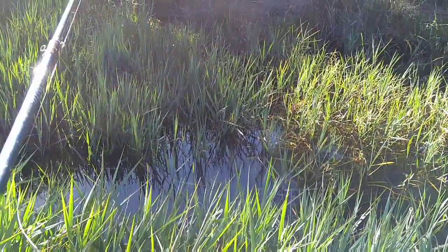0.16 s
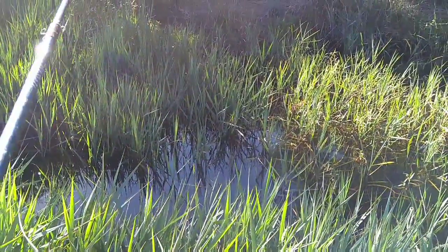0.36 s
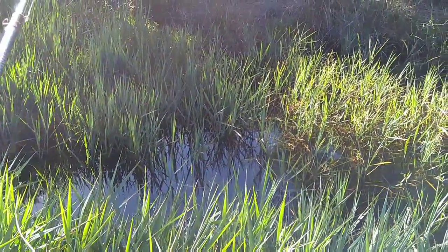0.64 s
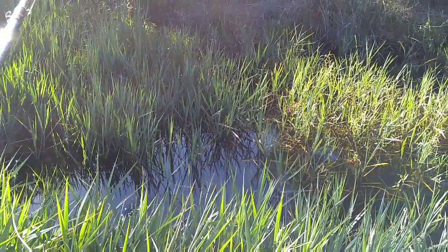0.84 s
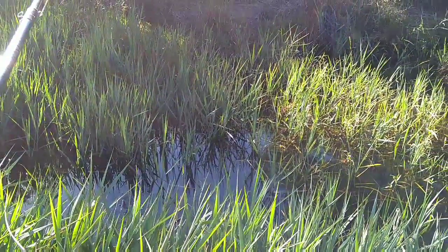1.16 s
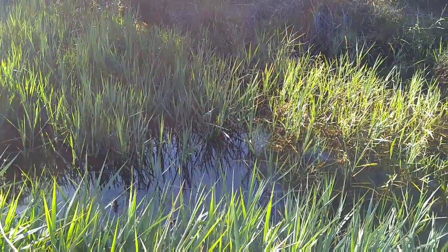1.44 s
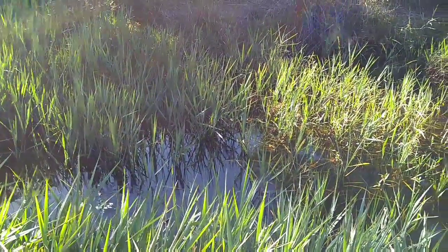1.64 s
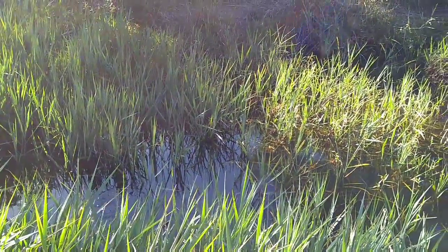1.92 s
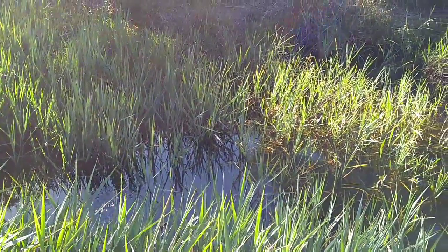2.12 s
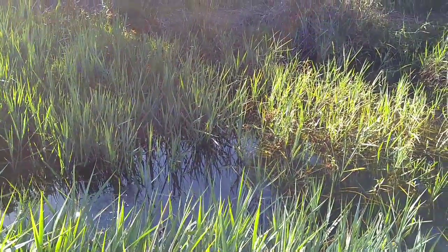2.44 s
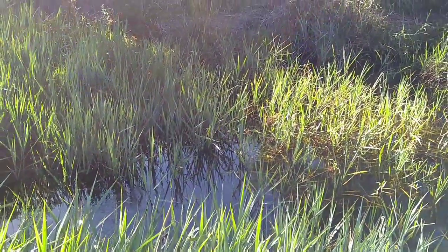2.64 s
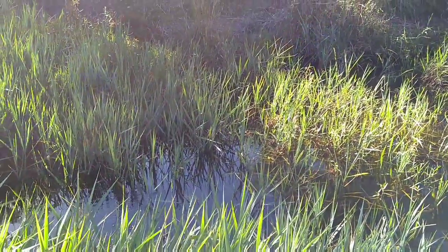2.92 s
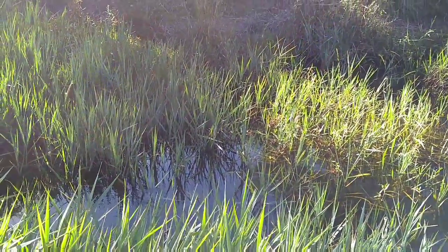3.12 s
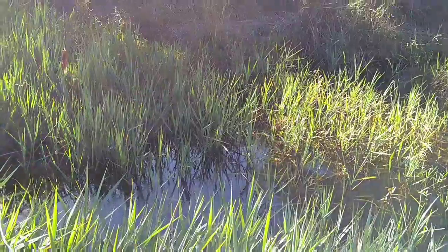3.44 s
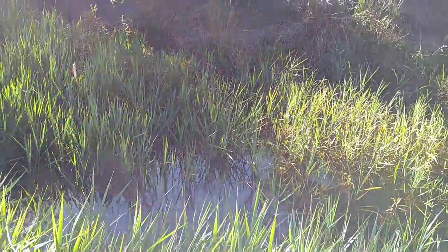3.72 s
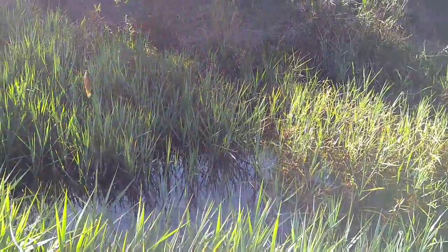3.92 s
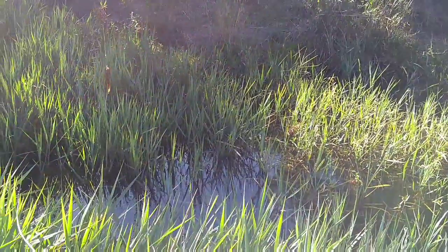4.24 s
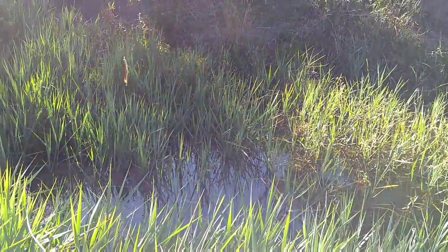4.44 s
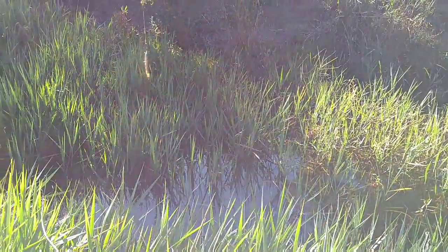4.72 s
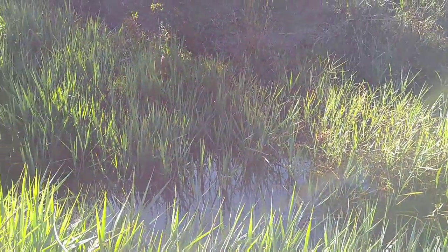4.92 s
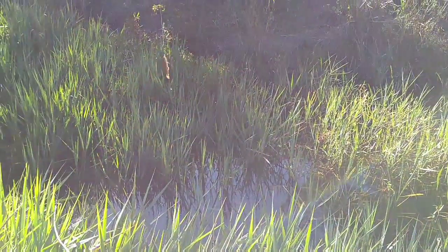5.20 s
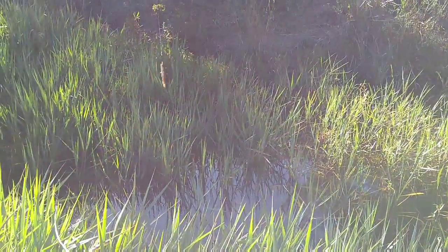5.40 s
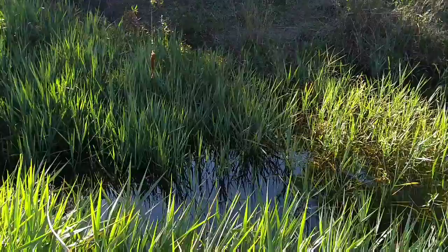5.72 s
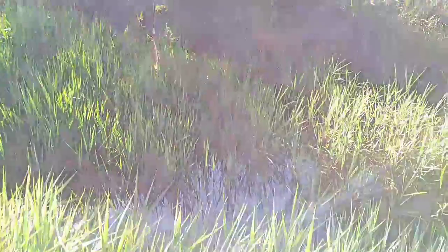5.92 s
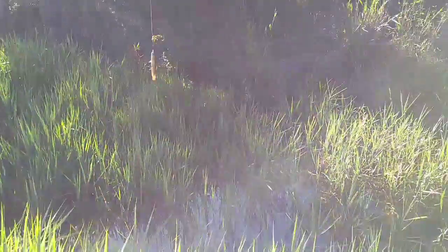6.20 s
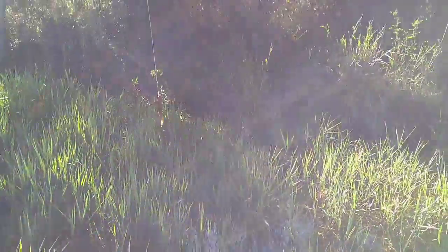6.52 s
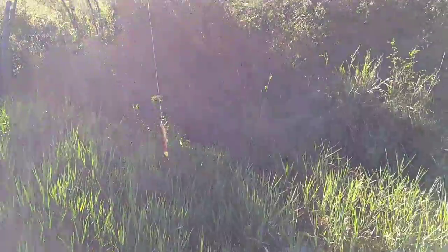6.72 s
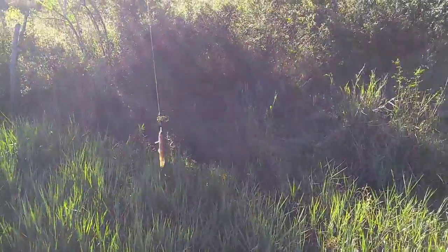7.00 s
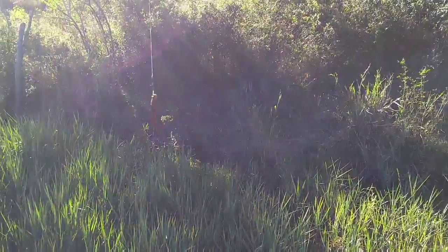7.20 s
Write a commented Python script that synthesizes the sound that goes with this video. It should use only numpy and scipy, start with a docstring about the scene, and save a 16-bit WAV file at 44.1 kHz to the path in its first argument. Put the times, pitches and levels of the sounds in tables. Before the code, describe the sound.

Many crickets trill and chirp brightly and continuously outdoors over faint rumble and hiss; a single hard knock and a small dry rustle interrupt.

```python
"""A reedy pond in the evening: crickets sing all around, some trilling on and on, others in even chirps.
Each wing stroke is a short falling sine tone, scattered by the reeds and echoed weakly by the far bank.
Shaped noise makes a far rumble and thin hiss; damped sines and noise make one sharp knock, gliding sines
a few faint pips, and filtered random clicks a dry rustle. The recorder drops samples: a sawtooth timing
error copies the song into bands below and above it."""
import sys
import numpy as np
from scipy import signal
from scipy.fft import rfft, irfft, next_fast_len
from scipy.io import wavfile
from scipy.ndimage import map_coordinates

SR = 44100
rng = np.random.default_rng(int(sys.argv[2]) if len(sys.argv) > 2 else 0)


def wav_record(signal):
    """Record a signal, one row per channel, as 16-bit PCM in the file named by sys.argv[1]."""
    frames = np.transpose(np.atleast_2d(signal))
    bounded = np.clip(frames, -1, 1)
    # unit amplitude maps onto the largest positive 16-bit level
    quanta = np.round(bounded * 32767).astype(np.int16)
    wavfile.write(sys.argv[1], SR, quanta)


N = 324135
TIME = np.arange(N) / SR  # s


def undb(db):
    """Decibels to gain."""
    return 10 ** (np.asarray(db) / 20)


def unit(x):
    """Scale to rms 1."""
    return x / np.sqrt(np.mean(x ** 2))


def curve(rows, axis=1):
    """One column of a time table, joined by straight lines."""
    rows = np.array(rows)
    return np.interp(TIME, rows[:, 0], rows[:, axis])


def walk(rate):
    """Smooth random drift with a spread near 1, taking `rate` new values per second."""
    steps = np.repeat(rng.standard_normal(int(N / SR * rate) + 2), 4)
    smooth = np.convolve(steps, np.hanning(9) / 3, "same")
    return np.interp(TIME * rate * 4, np.arange(len(smooth)), smooth)


def colour(x, points):
    """Filter by a spectrum of (f/Hz, level/dB) points, joined on a log frequency scale."""
    hz, db = np.transpose(points)
    size = next_fast_len(N)
    f = np.maximum(np.arange(size // 2 + 1) * SR / size, 1)
    gain = undb(np.interp(np.log(f), np.log(hz), db))
    return irfft(rfft(x, size) * gain, size)[..., :N]


def reeds(x, pan_db, lead_ms, scatter_db, t60=0.055):
    """The direct sound reaches the two microphones apart; the stems add a short diffuse tail."""
    size = next_fast_len(N + SR // 2)
    t = np.arange(SR // 3) / SR
    tail = rng.standard_normal((2, len(t))) * undb(-60 * t / t60)
    tail /= np.sqrt(np.sum(tail ** 2, axis=1, keepdims=True))
    sides = np.array([[.5], [-.5]])  # left, right
    f = np.arange(size // 2 + 1) * SR / size
    direct = np.exp(2j * np.pi * f * sides * lead_ms / 1000)
    paths = (direct + undb(scatter_db) * rfft(tail, size)) / np.hypot(1, undb(scatter_db))
    heard = irfft(rfft(x, size) * paths, size)[:, :N]
    # keep the source's level, then pan
    return heard * np.std(x) / np.std(heard, axis=1, keepdims=True) * undb(sides * pan_db)


# spectrum of rumble and hiss, relative: f/Hz, level/dB per Hz
AIR_SPECTRUM = [(20, -28), (45, -24), (75, -7), (115, 5), (160, -6), (230, -19), (400, -22), (760, -20.7),
                (1150, -24.3), (2700, -28), (3400, -32), (4100, -41), (8000, -43), (15000, -27)]
# stereo width of the air: f/Hz, side minus mid level/dB
AIR_WIDTH = [(30, 13), (70, 6), (130, 7.5), (260, 5), (600, -1.5), (2000, -3.5)]
# swell of the rumble, relative: t/s, level/dB
RUMBLE_SWELL = [(0, .5), (2.2, 0), (2.75, -2.5), (3.7, 1.5), (4.25, -2), (5.2, -1), (5.7, 2.5), (6.4, 2.5),
                (7.35, -4)]
AIR_DB = -60


def air():
    """A far rumble and thin hiss; the bass is largely opposed between left and right."""
    mid, side = unit(colour(rng.standard_normal((2, N)), AIR_SPECTRUM))
    both = mid + colour(side, AIR_WIDTH) * np.array([[1], [-1]])
    bass = colour(both, [(170, -1), (400, -30)])
    swell = undb(curve(RUMBLE_SWELL) + 1.2 * walk(6))
    balance_db = np.array([[-.7], [.7]])
    return undb(AIR_DB + balance_db) * (both + (swell - 1) * bass)


BANK_S, BANK_DB = .066, -22  # delay and level of the echo


def bank(x):
    """The far bank returns a weak, scattered echo."""
    late = np.interp(TIME - BANK_S, TIME, x.mean(axis=0), left=0)
    return x + undb(BANK_DB) * reeds(late, -3, 0, 10, t60=.12)


# faint pips: t/s, starting f/Hz, glide f/Hz, peak level/dB
PIP_NOTES = [(.208, 1170, 380, -57), (.277, 1420, -230, -50), (3.752, 640, -30, -59)]


def pips(glide_s=.024, decay_s=.007):
    """Short, pure, gliding notes from across the pond, each with a brief tail."""
    out = np.zeros(N)
    for start, hz, glide_hz, db in PIP_NOTES:
        age = np.maximum(TIME - start, 0)
        tone_hz = hz + glide_hz * (1 - np.exp(-age / glide_s))
        shape = age ** 2 * np.exp(-age / decay_s)
        tone = np.sin(2 * np.pi * np.cumsum(tone_hz) / SR)
        out += undb(db) * shape / shape.max() * tone
    return reeds(out, -1, .03, -8, t60=.2)


# dry rustles in the reeds: t/s, level/dB before the band filter
RUSTLE_STARTS = [(2.582, -24.5), (2.622, -26.5)]


def rustle(grains_per_s=700, decay_s=.025, low_hz=1400, high_hz=3500, snap=1.5):
    """Dry stems give way: a snap, then a fading run of tiny cracks."""
    chance, size = rng.random(N), rng.standard_normal(N)
    cracks = np.zeros(N)
    for start, db in RUSTLE_STARTS:
        age = TIME - start
        grains = (age > 0) * (chance < grains_per_s / SR) * size
        run = grains * np.exp(-np.abs(age) / decay_s)
        first = np.arange(N) == int(start * SR)
        cracks += undb(db) * (run + snap * first)
    stem = signal.butter(4, [low_hz, high_hz], "band", fs=SR, output="sos")
    return reeds(signal.sosfilt(stem, cracks), -1, .03, -2, t60=.08)


# ringing modes of the knock: f/Hz, t60/s, relative level/dB
KNOCK_RING = [(245, .04, -10), (431, .021, -13), (580, .02, -12), (818, .03, -2), (1030, .013, -3),
              (1440, .016, 2), (1653, .014, -11), (3250, .018, -13), (3640, .028, -12)]
KNOCK_S, KNOCK_DB = 1.8412, -21


def knock(crack_db=-4.5, crack_s=.004, wash_db=-21.5, wash_s=.05, attack_s=.00049):
    """One hard blow close by: a brief crack, quickly damped modes and a dull wash back from the reeds."""
    age = np.maximum(TIME - KNOCK_S, 0)
    ring = np.zeros(N)
    for k, (hz, t60, db) in enumerate(KNOCK_RING):
        decay = np.exp(-np.log(1000) * age / t60)
        ring += undb(db) * decay * np.sin(2 * np.pi * hz * age) * (-1) ** k  # alternate polarity
    crack_tone = [(40, -25), (200, -3), (450, 4), (2000, 3), (3500, 0), (8000, 3), (15000, -11)]
    crack = unit(colour(rng.standard_normal(N), crack_tone)) * np.exp(-age / crack_s)
    wash_tone = [(40, -25), (250, 3), (800, -3), (1400, -1), (3000, -5), (8000, -8), (15000, -21)]
    wash = unit(colour(rng.standard_normal((2, N)), wash_tone)) * np.exp(-age / wash_s)
    attack = 1 - np.exp(-age / attack_s)
    blow = reeds((ring + undb(crack_db) * crack) * attack, .7, 0.025, -12, t60=.06)
    return undb(KNOCK_DB) * (blow + undb(wash_db) * wash * attack)


# Every singer below: tone f/Hz, fall by the end of a stroke f/Hz, sounding share of a stroke [0-1],
# left minus right level/dB, left's lead t/ms, scatter level/dB
RASP, WAVER_HZ = .13, 18  # usual roughness of the strokes and spread of the tone


def cricket(singer, strokes, gain, rasp, waver_hz, sag_hz=0, uneven_db=1):
    """Each whole number of strokes is a wing closure: the wing rings anew and its tone droops as it slows."""
    hz, fall_hz, share, pan_db, lead_ms, scatter_db = singer
    # 0-1 through the sounding part, centred on the whole number
    along = np.clip(((strokes + .5) % 1 - .5) / min(share, 1) + .5, 0, 1)
    # the stroke swells and dies away smoothly
    swell = unit(np.abs(np.sin(np.pi * along ** 1.1)) ** 1.2)
    tone_hz = hz - sag_hz - fall_hz * along ** 4 + waver_hz * walk(120)
    # the file's teeth catch unevenly
    grip = (1 + rasp * walk(400)) * undb(uneven_db * walk(25))
    # the wing falls still between strokes, so each one starts at a chance point of the cycle
    number = np.cumsum(np.diff(np.round(strokes), prepend=0) != 0)
    start = rng.random(1000)[number % 1000]
    song = np.sqrt(2) * np.sin(2 * np.pi * (np.cumsum(tone_hz) / SR + start))
    return reeds(gain * swell * grip * song, pan_db, lead_ms, scatter_db)


def triller(singer, rate, db, waver_hz=28):
    """An endless trill whose pace drifts a little and whose strokes differ in strength."""
    strokes = rng.random() + np.cumsum(rate * (1 + .02 * walk(2))) / SR
    return cricket(singer, strokes, undb(db + .7 * walk(5)), RASP, waver_hz, uneven_db=1.4)


BOUT_FADE_S = .15  # time a far trill takes to start and to stop


def bouts(singer, rows, rate):
    """A far, wavering trill comes and goes: each bout fades in, holds and fades out."""
    gain = np.zeros(N)
    for start, stop, db in rows:
        from_edge = np.minimum(TIME - start, stop - TIME)
        gain += undb(db) * np.clip(from_edge / BOUT_FADE_S, 0, 1)
    return gain * triller(singer, rate, 0, waver_hz=42)


# far singers, columns as listed above cricket()
FAR_LOW = (4730, 180, .8, -3.8, -.093, -9)
FAR_DEEP = (4635, 110, .95, -3.2, -.096, -8)
FAR_DEEPEST = (4545, 90, .85, -4.5, -.092, -8)
FAR_HIGH = (6560, 300, .9, -1.5, .07, -1)
FAR_SOFT = (5105, 130, .9, -2, .09, -3)
FAR_THIN = (7220, 400, .9, -4, .02, -2)
# each far trill's bouts: start t/s, stop t/s, level/dB
FAR_BOUTS = {"low": [(-.3, 2.1, -51), (1.9, 3.35, -59), (5, 7.6, -54.5), (7.12, 7.6, -53)],
             "deep": [(-.3, 3.3, -51.5), (5, 7.6, -53)], "deepest": [(-.3, 2, -58), (4.4, 5.1, -63),
             (5, 7.6, -57)], "high": [(-.3, 3.45, -46.5), (3.5, 7.6, -62)], "soft": [(-.05, .6, -53),
             (1.1, 1.55, -52), (1.9, 2.3, -55), (4.65, 5.05, -59), (6.1, 6.6, -57), (7.08, 7.6, -44)],
             "thin": [(1.9, 2.6, -64), (3.05, 3.6, -64), (4.3, 6.4, -66)]}


def far_trills():
    """Six distant crickets whose wings stroke steadily within separate bouts of song."""
    far = bouts(FAR_LOW, FAR_BOUTS["low"], rate=47.3)
    far += bouts(FAR_DEEP, FAR_BOUTS["deep"], rate=49.5)
    far += bouts(FAR_DEEPEST, FAR_BOUTS["deepest"], rate=51.8)
    far += bouts(FAR_HIGH, FAR_BOUTS["high"], rate=44.15)
    far += bouts(FAR_SOFT, FAR_BOUTS["soft"], rate=50.7)
    far += bouts(FAR_THIN, FAR_BOUTS["thin"], rate=45)
    return far


# crowd members: tone f/Hz, stroke rate f/Hz, level/dB relative to the crowd's loudness
CROWD_SINGERS = [(5470, 55, -9), (5560, 43, -9.5), (5700, 47, -9), (5775, 29.6, -6), (5865, 44, -6.5),
                 (5955, 34, -6.5), (6028, 31.6, -5), (6090, 49, -10), (6125, 52, -8.5)]
# loudness of the crowd: t/s, level/dB
CROWD_LOUDNESS = [(0, -43.5), (.88, -45), (1.19, -41.5), (1.53, -45), (1.65, -43.5), (2.86, -45.5),
                  (3.26, -43.5), (3.74, -46), (3.92, -42), (4.32, -46), (4.42, -44.5), (5.1, -45.5),
                  (6.11, -44.5), (6.55, -47.5), (6.75, -43), (7.16, -47), (7.3, -43)]


def crowd():
    """Many endless trills at their own tones and paces blur together and swell as one."""
    loudness_db = curve(CROWD_LOUDNESS)
    out = np.zeros((2, N))
    for hz, rate, db in CROWD_SINGERS:
        out += triller((hz, 200, .72, -5, .024, -2), rate, loudness_db + db)
    return out


def chirper(singer, chirps, rise_s, sag_hz, rasp, waver_hz):
    """Runs of evenly paced strokes: the first ones are weak and flat, then the wings reach full effort."""
    strokes, gain, effort = np.zeros((3, N))
    for start, last, rate, db in chirps:
        on = (TIME > start) & (TIME < last + .5 / rate)
        strokes[on] = (TIME[on] - last) * rate
        effort[on] = np.minimum((TIME[on] - start) / rise_s, 1) ** 2
        gain[on] = undb(db)
    return cricket(singer, strokes, gain * effort, rasp, waver_hz, sag_hz * (1 - effort))


# chirping singers, columns as listed above cricket()
HIGH = (6582, 170, .68, -4.7, -.06, -6)
MIDDLE = (6214, 70, .68, -6.5, .034, -7)
LOW = (4936, 45, .8, -6, .027, -13)
HOARSE = (5330, 200, .82, -1.5, -.008, -1)
# each cricket's chirps: start t/s, last stroke t/s, stroke rate f/Hz, level/dB at full effort
CHIRP_RUNS = { "high": [(-.2, .179, 42.4, -44), (.53, .927, 42.3, -43.5), (1.3, 1.65, 42.6, -42.5),
              (2, 2.421, 42.7, -42.5), (2.75, 3.146, 42.8, -41), (3.57, 3.965, 42.7, -40.5),
              (4.3, 4.638, 43.9, -46), (4.99, 5.398, 44.5, -46), (5.74, 6.138, 43.9, -49),
              (6.46, 6.878, 44.3, -47.5)], "middle": [(.3, .595, 39.3, -46.5), (.98, 1.247, 39.6, -45.5),
              (1.66, 1.999, 40, -45), (2.35, 2.65, 39.7, -47), (3.14, 3.45, 39.6, -43.5),
              (3.8, 4.123, 40.2, -43.5), (4.46, 4.798, 40, -42.5), (5.2, 5.524, 39.7, -42.5),
              (5.94, 6.273, 39.8, -42.5), (6.69, 7.054, 39.4, -47)], "low": [(2.81, 3.166, 43.4, -42.5),
              (3.81, 4.203, 43.2, -42.5)], "hoarse": [(.2, .45, 52, -52), (1.15, 1.4, 52, -51),
              (2.15, 2.4, 52, -51.5), (3.64, 3.849, 52.9, -46), (4.382, 4.602, 52, -56),
              (5.11, 5.37, 53.2, -45), (5.83, 6.066, 50.3, -46), (6.47, 6.736, 54.7, -46),
              (7.166, 7.321, 51.4, -44)]}


def chirping_crickets():
    """Four crickets whose wings stroke in short runs, with rests between."""
    out = chirper(HIGH, CHIRP_RUNS["high"], rise_s=.03, sag_hz=80, rasp=RASP, waver_hz=WAVER_HZ)
    out += chirper(MIDDLE, CHIRP_RUNS["middle"], rise_s=.03, sag_hz=60, rasp=RASP, waver_hz=WAVER_HZ)
    out += chirper(LOW, CHIRP_RUNS["low"], rise_s=.15, sag_hz=200, rasp=.03, waver_hz=6)
    out += chirper(HOARSE, CHIRP_RUNS["hoarse"], rise_s=.07, sag_hz=30, rasp=.2, waver_hz=30)
    return out


# near singers, columns as listed above cricket()
LEAD = (5616, 250, .66, -7.5, .024, -7)
RIVAL = (5624, 230, .62, -6.5, .024, -5)
# loudness of the nearest trill: t/s, level/dB
LEAD_LOUDNESS = [(0, -52), (1.1, -52), (1.5, -48), (2.8, -50), (3.2, -44.5), (4.1, -45), (4.5, -42.5),
                 (5.3, -43), (6, -45.5), (6.5, -52), (7.2, -46.5)]
# loudness of the second near trill: t/s, level/dB
RIVAL_LOUDNESS = [(0, -56), (2.8, -56), (3.2, -50), (4.5, -48.5), (5.6, -49), (6.3, -57)]
# strokes per second and the middle of one stroke
LEAD_RATE_HZ, LEAD_STROKE_S = 27.265, .0222
RIVAL_RATE_HZ, RIVAL_STROKE_S = 28.9, 4.7055


def near_trills():
    """Two close crickets stroke at slightly different steady rates, so they drift in and out of step."""
    lead_strokes = (TIME - LEAD_STROKE_S) * LEAD_RATE_HZ
    rival_strokes = (TIME - RIVAL_STROKE_S) * RIVAL_RATE_HZ
    lead = cricket(LEAD, lead_strokes, undb(curve(LEAD_LOUDNESS)), RASP, WAVER_HZ)
    rival = cricket(RIVAL, rival_strokes, undb(curve(RIVAL_LOUDNESS)), RASP, WAVER_HZ)
    return lead + rival


def scene():
    """Crickets, the knock, the pips and the rustle, echoed by the bank, over the evening air."""
    chorus = far_trills() + crowd() + chirping_crickets() + near_trills()
    return air() + bank(pips() + rustle() + knock() + chorus)


SAMPLE_SLIP_HZ, TOP_HZ = 3889.8, 15150  # rate of the timing sawtooth; upper limit of the sound


def record(dry):
    """Dropped samples make a sawtooth timing error, copying tones up and down by its rate; the top is cut."""
    late = (TIME * SAMPLE_SLIP_HZ % 1 - .5) * SR / (SR + SAMPLE_SLIP_HZ)  # in samples
    read_at = np.arange(N) - late
    slipped = np.array([map_coordinates(side, [read_at], order=3, mode="nearest") for side in dry])
    top_cut = signal.ellip(8, .2, 70, TOP_HZ, fs=SR, output="sos")
    return signal.sosfilt(top_cut, slipped)


dry = scene()
out = record(dry)
wav_record(out)
```